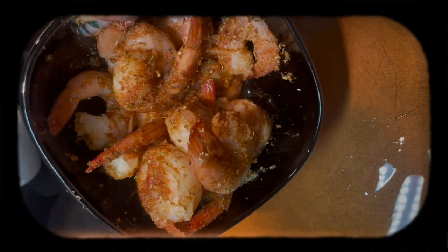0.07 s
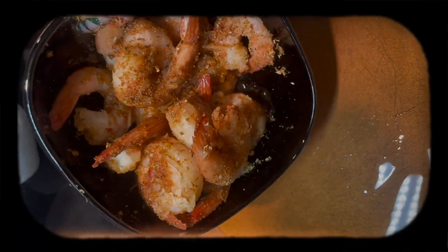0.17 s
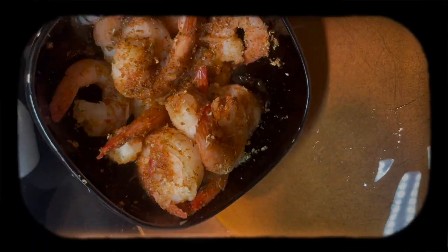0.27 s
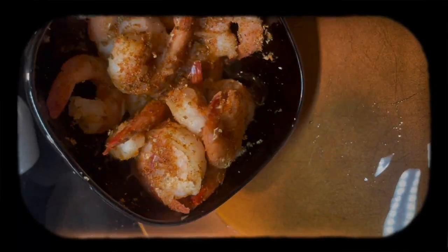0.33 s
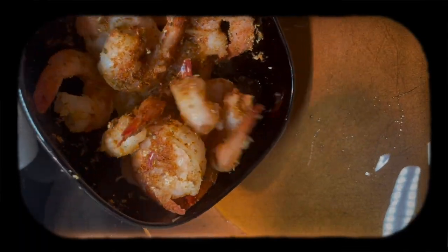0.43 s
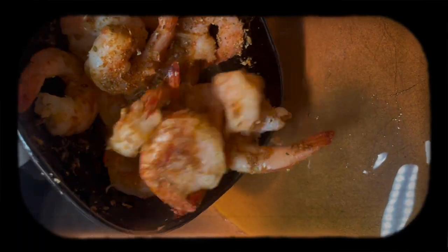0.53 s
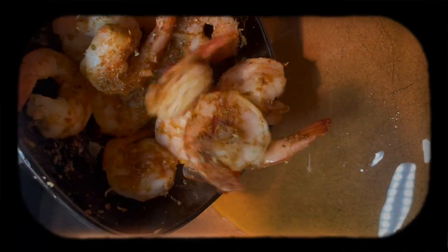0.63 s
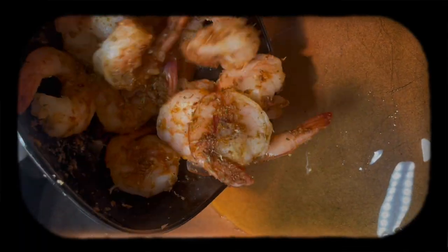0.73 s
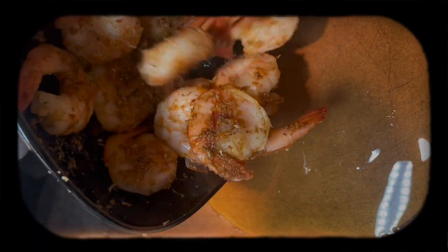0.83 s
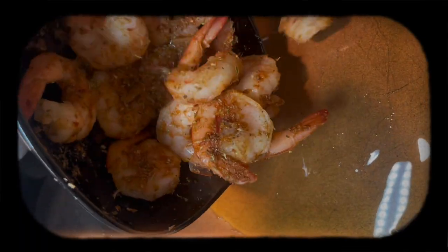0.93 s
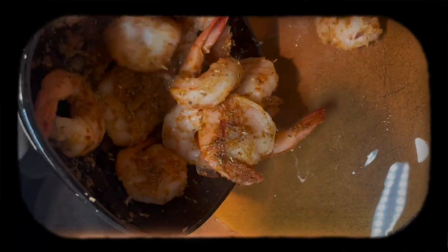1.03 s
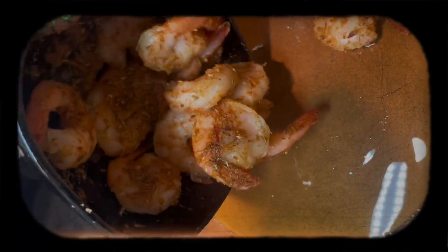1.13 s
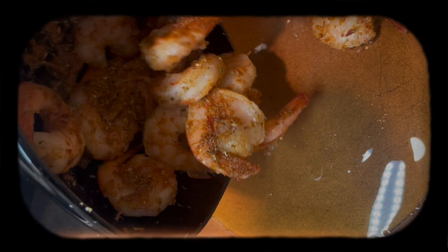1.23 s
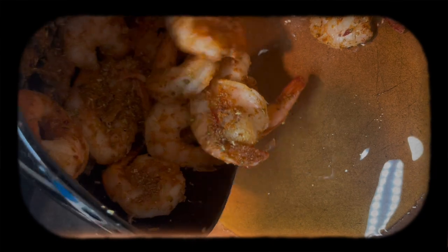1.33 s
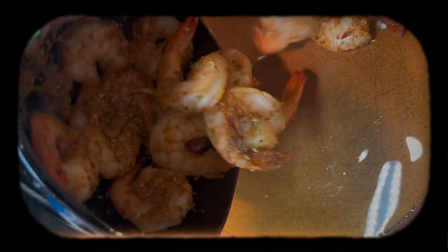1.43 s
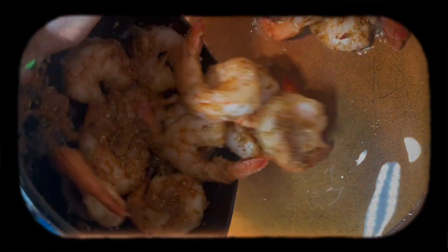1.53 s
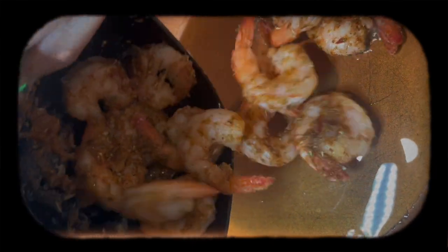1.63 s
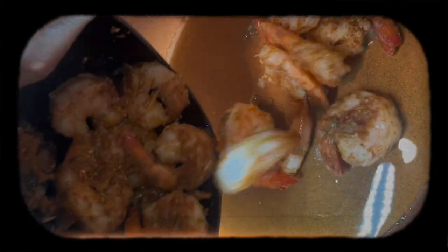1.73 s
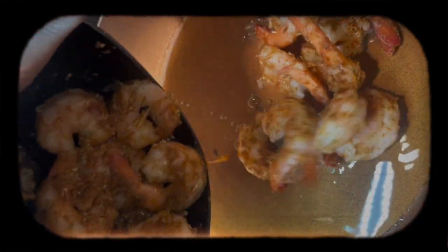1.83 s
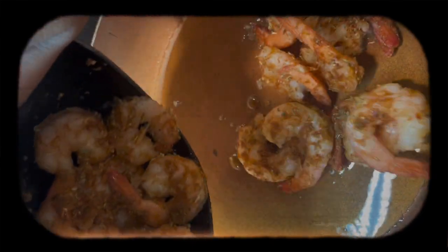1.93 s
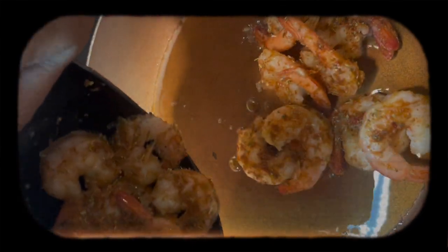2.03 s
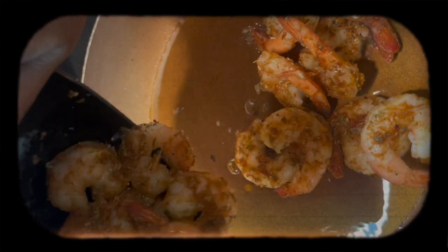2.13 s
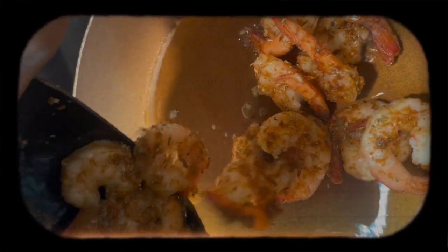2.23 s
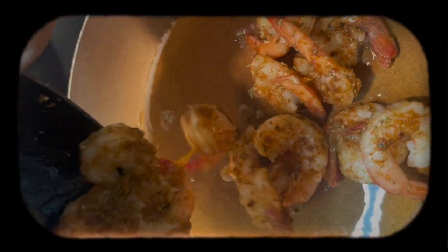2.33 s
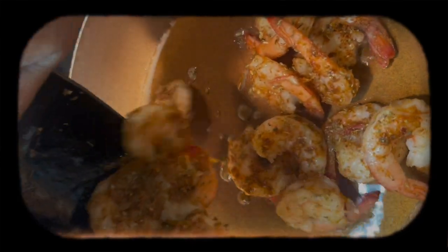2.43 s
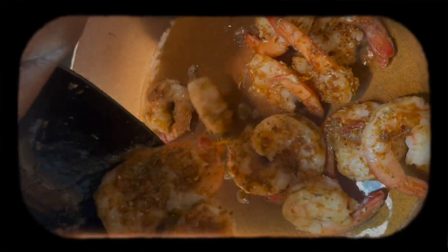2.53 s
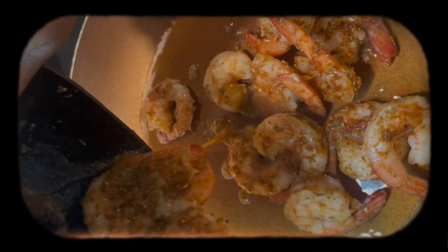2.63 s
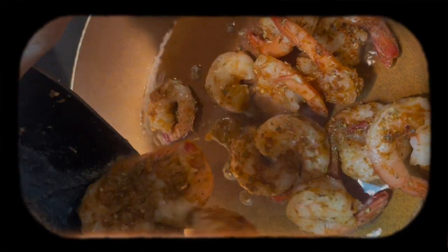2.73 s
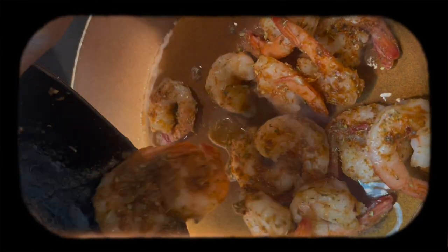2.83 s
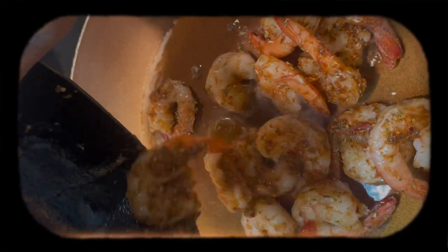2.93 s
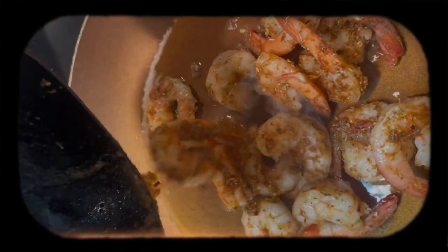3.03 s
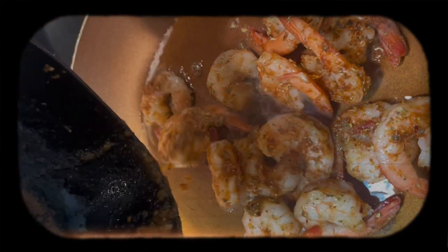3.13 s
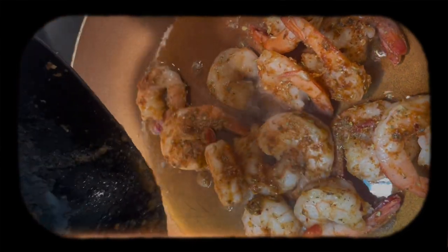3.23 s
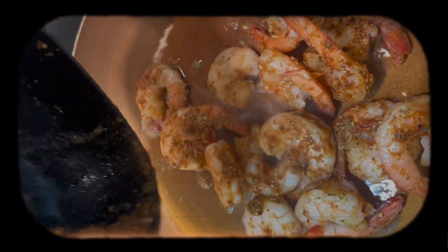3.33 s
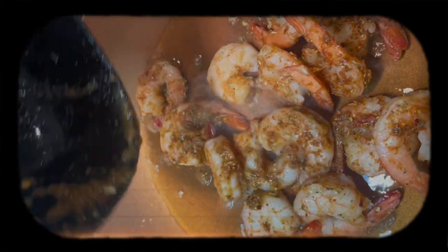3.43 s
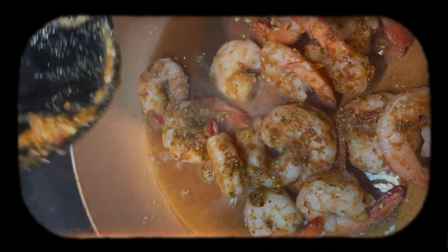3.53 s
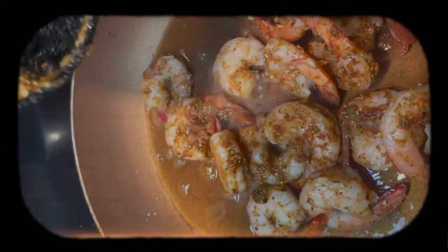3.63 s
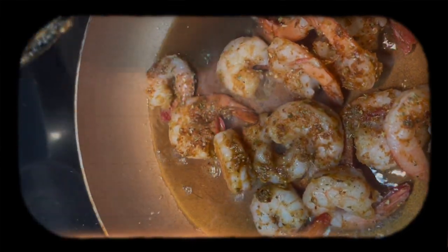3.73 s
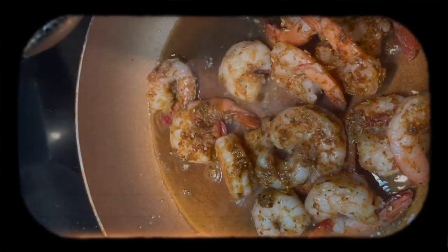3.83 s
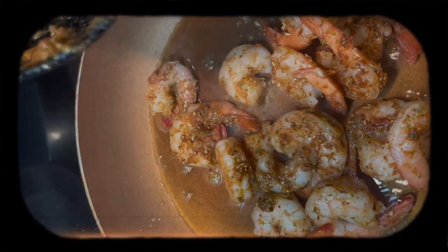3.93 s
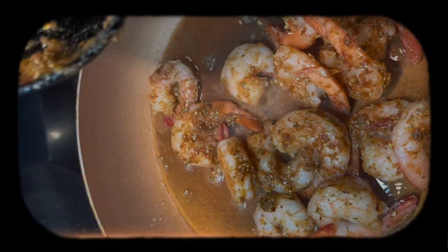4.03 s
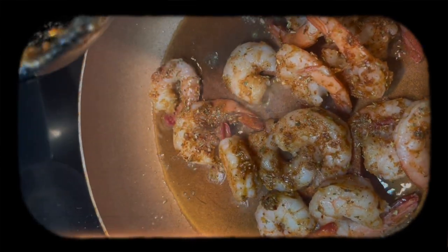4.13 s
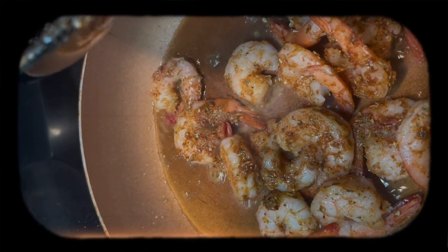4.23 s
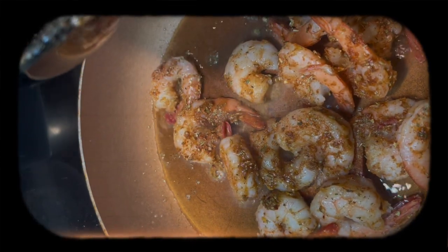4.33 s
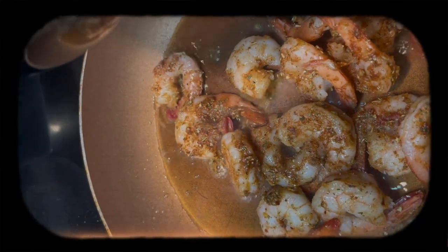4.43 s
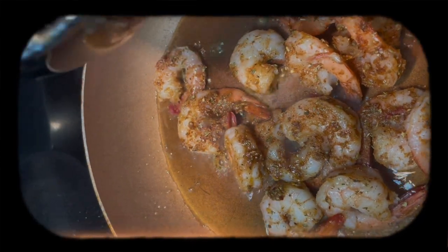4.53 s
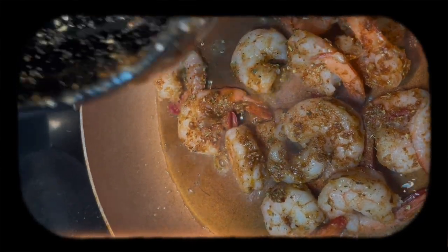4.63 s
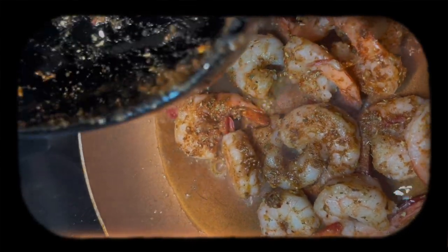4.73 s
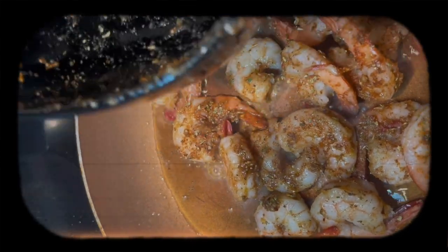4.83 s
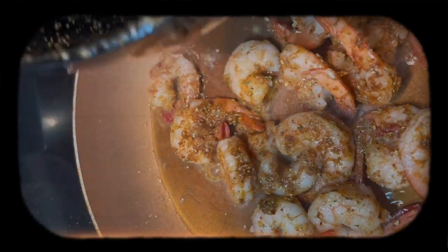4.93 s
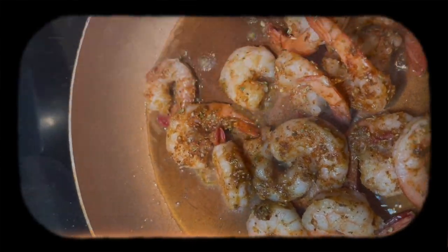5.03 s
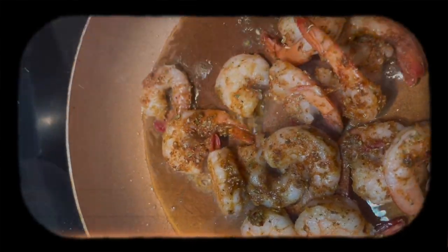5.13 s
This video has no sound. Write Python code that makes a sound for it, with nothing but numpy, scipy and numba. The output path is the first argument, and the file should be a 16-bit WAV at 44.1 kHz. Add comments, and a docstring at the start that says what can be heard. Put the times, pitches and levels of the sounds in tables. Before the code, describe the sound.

Close stereo view of a frying pan in a home kitchen. A faint low fan hum comes first, then small wet ticks as shrimp slide out of a bowl. They land in hot oil with soft thuds and slaps, each batch adding crackle. The sizzle grows quickly into a bright, steady hiss with sharp oil spits and an occasional deeper steam pop.

```python
"""A kitchen fan hums from the start: two tones and filtered noise. Seasoned shrimp creep out of a bowl near a
two-port microphone, unsticking with small wet ticks made of torn noise and tiny chirping rings.
Then they land in hot oil with soft thuds (pulses, noise and pan modes), while batches of water flash into
thousands of short bubble rings. The crackle builds to a steady hiss, with sharp spits of oil and deeper pops of
steam on top."""
import sys
import numpy as np
from scipy import signal
from scipy.fft import rfft, irfft, next_fast_len
from scipy.io import wavfile
from scipy.ndimage import uniform_filter1d
from numba import njit

SR = 44100
rng = np.random.default_rng(int(sys.argv[2]) if len(sys.argv) > 2 else 0)


def unload_audio(sound):
    """Save the sound as a 16-bit wav file, at the path given as the first command line argument."""
    columns = np.transpose(np.atleast_2d(sound))
    # keep every value between -1 and 1, then stretch to whole-number steps
    steps = np.round(np.clip(columns, -1, 1) * 32767)
    wavfile.write(sys.argv[1], SR, steps.astype(np.int16))


N = 228658
T = np.arange(N) / SR
SIZE = 2 * next_fast_len(N)
HZ = np.maximum(np.fft.rfftfreq(SIZE, 1 / SR), 1)
TOP_HZ = 15750  # upper limit of the sizzle and of the recorder


def undb(db):
    """Decibels to gain."""
    return 10 ** (np.asarray(db) / 20)


def unit(x):
    """Scale to rms 1."""
    return x / np.sqrt(np.mean(x ** 2))


def curves(rows):
    """Columns of a time table at every sample."""
    s, *columns = np.transpose(rows)
    return [np.interp(T, s, c) for c in columns]


def spectra(rows):
    """Columns of a frequency table at every bin, drawn along log frequency."""
    hz, *columns = np.transpose(rows)
    return [np.interp(np.log(HZ), np.log(np.sort(hz)), c) for c in columns]


def shape(x, gain):
    """Filter by a gain for every bin."""
    return irfft(rfft(x, SIZE) * gain, SIZE)[..., :N]


def below(hz, order=4):
    """Gain of a smooth low-pass; one minus this is the matching high-pass."""
    return 1 / (1 + (HZ / hz) ** order)


def fade(t60):
    """Exponential decay down to -60 dB."""
    return np.exp(-np.log(1000) * T[:int(t60 * SR) + 2] / t60)


def ring(hz, t60, rise=0):
    """One damped resonance; its pitch may rise by a share while it dies."""
    decay = fade(t60)
    t = T[:len(decay)]
    return decay * np.sin(2 * np.pi * hz * t * (1 + rise * t / t60 / 2))


def burst(t60):
    """Noise that dies away."""
    decay = fade(t60)
    return decay * rng.standard_normal(len(decay))


def pulse(hz):
    """One push of air: a single peak between two shallow dips."""
    a = (np.pi * (hz * T[:int(2 * SR / hz) + 1] - 1)) ** 2
    return (1 - 2 * a) * np.exp(-a)


def spatter(t60, spread_db=5, grain_s=.0012):
    """A wet tearing sound: one full snap, then uneven, mostly smaller ones that die away."""
    noise = burst(t60)
    grain = (np.arange(len(noise)) / (grain_s * SR)).astype(int)
    chance = np.clip(rng.standard_normal(grain[-1] + 1), -2, 2)
    size_db = spread_db * (chance - .5)
    return noise * undb(np.where(grain > 0, size_db[grain], 0))


def add(out, s, sound):
    """Mix a sound in at a time."""
    i = max(int(s * SR), 0)
    out[i:i + len(sound)] += sound[:max(N - i, 0)]


def walk(rate_hz):
    """Slow random wandering around zero, rms 1."""
    return unit(shape(rng.standard_normal(N), below(rate_hz)))


@njit
def grains(start, hz, cycles, size):
    """Each bubble rings for a cycle or so as it bursts."""
    out = np.zeros(N)
    for k in range(len(start)):
        length = cycles[k] * SR / hz[k]
        z = size[k] + 0j
        # turn by the pitch and shrink by about 50 dB over the length
        p = np.exp(2j * np.pi * hz[k] / SR - 5.75 / length)
        for i in range(start[k], min(N, start[k] + int(length) + 1)):
            z *= p
            out[i] += z.imag
    return out


def crackle(rate, spread_db, cycles, top_db, busy):
    """Bubbles of all pitches, many small and a few large; busy (0-1) thins the rate per second."""
    when, pitch, length, size, luck = rng.random((int(rate * N / SR), 5)).T
    start = (when * N).astype(np.int64)
    size_db = np.minimum(-spread_db * np.log(1 - size), top_db)
    # fewer bubbles are each made stronger, so thinning keeps the power
    sizes = undb(size_db) * (luck < busy[start]) / np.sqrt(busy[start])
    x = grains(start, 1200 + 15800 * pitch, cycles * (.5 + length), sizes)
    x = x - x.mean()
    # flatten the smoothed spectrum, so that colour is free to be added later
    power = uniform_filter1d(np.abs(rfft(x, SIZE)) ** 2, size=6001)
    return unit(shape(x, 1 / np.sqrt(power)))


# Swell of the whole fan. Each row: time in seconds, level in dB.
FAN_SWELL = [(0, -59.5), (1.1, -58), (2.4, -51), (3.15, -49.5), (3.6, -51.5), (5.18, -52)]
# Colour of the air the fan moves. Each row: frequency in Hz, relative level in dB.
AIR_COLOUR = [(25, -26), (45, -2), (80, 0), (130, -2), (190, -9), (280, -5.5), (335, -9), (385, 0.5),
              (430, -12.5), (480, -19.5), (850, -22.5), (1100, -32), (1600, -37.5), (3000, -48),
              (15000, -58)]


def fan(hum_hz=59, hum_db=0, mains_hz=120, mains_db=-11, air_db=-4.0, side_db=-12):
    """A motor hums at 59 Hz, with its magnetic buzz at 120 Hz and a low rush of air."""
    hum = undb(hum_db + .5 * walk(1.5)) * np.sin(2 * np.pi * hum_hz * T)
    buzz = undb(mains_db + 0.94 * walk(3.9)) * np.sin(2 * np.pi * mains_hz * T)
    colour = undb(spectra(AIR_COLOUR)[0])
    mid, side = (unit(shape(rng.standard_normal(N), colour)) for _ in range(2))
    side = shape(side, 1 - below(100))  # long waves reach both ports alike
    air = undb(air_db) * (mid + undb(side_db) * np.array([side, -side]))
    return (np.sqrt(2) * (hum + buzz) + air) * undb(curves(FAN_SWELL)[0])


# Wet ticks of shrimp coming unstuck from the bowl and each other. Each row: start in seconds,
# level of the rings in dB, starting pitch of a larger and of a smaller air pocket in Hz,
# t60 of the rings in seconds, level of the snap in dB, t60 of the snap in seconds.
WET_TICKS = [(.339, -75, 2900, 5000, .02, -66, .02), (.422, -62, 7000, 12900, .005, -52, .008),
             (.473, -66, 3100, 7000, .015, -58, .012), (.4835, -49, 3100, 3270, .055, -45, .085),
             (.526, -55, 7000, 13500, .012, -48, .022), (.547, -66, 7000, 13500, .005, -56, .008),
             (.575, -55, 1100, 1710, .02, -46, .04), (.595, -60, 5500, 7000, .012, -52, .012),
             (.5995, -58, 5800, 13500, .008, -49, .01), (.673, -54, 7000, 13000, .005, -44, .006),
             (.6803, -46, 1910, 2400, .02, -47, .025), (.756, -59, 3700, 4300, .014, -54, .012),
             (.802, -60, 7500, 13500, .006, -51, .008), (.8085, -53, 8000, 12500, .01, -44, .011),
             (.984, -45.5, 1800, 2200, .024, -46, .03)]
# The creep over the tilted bowl: start and time to full speed in seconds, level then, rise up to it in dB.
CREEP_S, CREEP_RISE_S, CREEP_DB, CREEP_RANGE_DB = 0.21, 0.62, -64.5, 31


def unsticking(snap_hz=1800, film_hz=1600):
    """Films of marinade stretch and snap; each snap rings two tiny air pockets that chirp as they close."""
    films = crackle(rate=9000, spread_db=3.2, cycles=1.5, top_db=17, busy=np.ones(N))
    speed = np.clip((T - CREEP_S) / CREEP_RISE_S, 0, 1)
    film_db = CREEP_DB - CREEP_RANGE_DB * (1 - speed) ** 2
    out = shape(films * undb(film_db), 1 - below(film_hz))
    snaps = np.zeros(N)
    for s, db, low_hz, high_hz, t60, snap_db, snap_t60 in WET_TICKS:
        add(snaps, s, undb(snap_db) * spatter(snap_t60))
        pockets = ring(low_hz, t60, rise=.15) + ring(high_hz, t60, rise=.15)
        add(out, s, undb(db) * pockets)
    return out + shape(snaps, 1 - below(snap_hz, order=2))


# Batches of shrimp meeting the oil. Each row: start in seconds, level of the sizzle they add in dB,
# time constant of its build-up in seconds, extra strength of the first flash of steam in dB.
OIL_BATCHES = [(0.885, -45.5, 0.055, 1.5), (1.22, -54, 0.045, 0), (1.385, -38.5, 0.23, 1.5),
               (1.68, -34.5, 0.065, -3), (1.88, -32.5, 0.085, -1), (2.2, -36, 0.072, 3),
               (2.395, -28, 0.024, -0.5), (2.6, -38, .04, -18)]
# Bubble sizes: fine fizz, middle, coarse. Each row: relative steady level in dB,
# relative level of the flash in dB, time constant of the flash's fade in seconds.
BUBBLE_SIZES = [(-3, 1.8, 0.46), (-2.5, -5.5, 2.3), (-11.5, -17, 0.36)]
# Time constant in seconds for juice to seep out and feed the steady sizzle, one per bubble size.
JUICE_SEEP_S = [0.56, 0.3, 1]
# Trapped marinade boiling off in short flares. Each row: start in seconds, hold in seconds,
# level of the fine bubbles in dB, level of the middle bubbles in dB.
MARINADE_FLARES = [(0.876, .015, -45, -60), (1.455, .04, -57, -58), (1.746, 0.027, -48, -42),
                   (1.925, 0.02, -48, -41), (2.105, .035, -45, -36), (2.455, 0.047, -42, -31.5),
                   (3.138, 0.3, -33, -27)]
FLARE_ATTACK_S, FLARE_RELEASE_S = 0.013, 0.042
CONTACT_DB, CONTACT_S = 1.5, .024  # surge of the flash at the moment of contact, and its fade


def steam():
    """Level in dB of each bubble size: every batch flashes off surface water, then settles to a sizzle."""
    power = np.zeros((len(BUBBLE_SIZES), N))
    for k, (steady_db, flash_db, flash_s) in enumerate(BUBBLE_SIZES):
        for s, db, build_s, wet_db in OIL_BATCHES:
            age = np.maximum(T - s, 0)
            contact = undb(CONTACT_DB) ** 2 * np.exp(-age / CONTACT_S)
            flash = undb(flash_db + wet_db) ** 2 * (np.exp(-age / flash_s) + contact)
            steady = undb(steady_db) ** 2 * (1 - np.exp(-age / JUICE_SEEP_S[k]))
            power[k] += undb(db) ** 2 * (1 - np.exp(-age / build_s)) * (flash + steady)
    for s, hold_s, fine_db, middle_db in MARINADE_FLARES:
        corners = s + np.cumsum([0, FLARE_ATTACK_S, hold_s, FLARE_RELEASE_S])
        flare = np.interp(T, corners, [0, 1, 1, 0])
        power[:2] += np.outer(undb([fine_db, middle_db]) ** 2, flare)
    return 10 * np.log10(power + 1e-14)


# Colour of the bursting bubbles. Each row: frequency in Hz, relative level in dB.
BUBBLE_COLOUR = [(30, -32), (100, -33), (250, -16), (700, -17), (1450, -12.5), (2200, -8), (2700, -6),
                 (4000, -3.5), (4900, -4.5), (5700, -2.5), (7900, 0), (9000, -0.2), (11700, 1.5),
                 (13800, 5), (15700, 0.5)]
# Resonances of the loaded pan, which tint the sizzle and ring under blows.
# Each row: nominal pitch in Hz, relative level when struck in dB, t60 in seconds.
LOADED_PAN = [(167, -11, .076), (308, -6, .12), (485, -7, .04), (668, -6.5, .08), (835, -7, .05),
              (1160, 0, .014), (1900, -2, .016), (2620, -9, .018), (3160, -12, .02), (6368, -14, .028)]


def pan_colour(ring_db=-4):
    """Spectrum of the bubbles, lifted where the pan resonates; oil and food widen its modes."""
    peaks = sum(1 / (1 + ((HZ - hz) * t60 / 2) ** 2) for hz, _, t60 in LOADED_PAN)
    return undb(spectra(BUBBLE_COLOUR)[0]) * (1 + undb(ring_db) * peaks)


def sizzle(levels, surge_db=0.96, patchy_db=0.5, fizz_db=-2.0, middle_db=0, coarse_db=1, sparse_db=-30):
    """Water flashes to steam in the oil: three sizes of bubble crackle in their own bands and levels."""
    busy = np.clip(undb(levels[0] - sparse_db), .5, 1)  # a quiet pan has fewer bubbles, so single ones stand out
    fine = crackle(rate=30000, spread_db=3.55, cycles=1.2, top_db=20, busy=busy)
    coarse = crackle(rate=36000, spread_db=2.4, cycles=1.2, top_db=13, busy=busy)
    colour = pan_colour() * (HZ < TOP_HZ)
    under_fizz, under_middle = below(9140, order=12), below(3144, order=10)
    sizes = [(fine, 1 - under_fizz, fizz_db),
             (fine, np.sqrt(1 - under_middle) * under_fizz, middle_db),
             (coarse, np.sqrt(under_middle), coarse_db)]
    out = np.zeros(N)
    for (x, band, db), level in zip(sizes, levels):
        bubbles = unit(shape(x, colour * band))
        # every size of bubble comes and goes a little on its own
        out += bubbles * undb(level + db + patchy_db * walk(18))
    return out * undb(surge_db * walk(3.7))


def pan_ring(blow_hz, octaves, detune=.025, uneven_db=3):
    """A blow rings modes near its pitch; where it falls and how food lies change their tuning and strength."""
    out = np.zeros(SR // 2)
    chances = rng.uniform(-1.1, 1, (len(LOADED_PAN), 3))
    for (hz, db, t60), (shift, size, side) in zip(LOADED_PAN, chances):
        reach = np.exp(-.5 * (np.log2(hz / blow_hz) / octaves) ** 2)
        gain = np.sign(side) * reach * undb(db + uneven_db * size)
        add(out, 0, gain * ring(hz * (1 + detune * shift), t60))
    return out


# Shrimp landing in the pan. Each row: start in seconds, level of the thud in dB, pitch of the thud in Hz,
# base level of the wet slap in dB, which the splash and the pan ring are set against.
PAN_LANDINGS = [(.885, -43, 85, -66), (.915, -48, 85, -66), (1.55, -41, 135, -39), (1.572, -43, 150, -45),
                (1.581, -46, 120, -41), (1.672, -50, 130, -46), (1.682, -38.5, 100, -42),
                (1.699, -44, 170, -48), (1.778, -45, 95, -45), (1.855, -50, 150, -44.5),
                (2.234, -39, 84.5, -41), (2.264, -40, 90, -44.5), (2.333, -44, 110, -42),
                (2.408, -39.5, 232, -37), (2.4912, -31.5, 105, -48), (2.531, -36.5, 95, -41),
                (2.578, -37, 150, -30.5), (2.597, -41, 230, -39), (2.899, -41, 110, -39),
                (3.17, -40, 95, -41)]


def landings(rock_hz=72, rock_t60=.09, rock_db=-12, pan_db=-3.0, splash_db=2, splash_t60=0.072,
             splash_hz=1700, flop_db=5.0, flop_t60=0.13, flop_hz=190):
    """Soft flesh pushes the pan, rocks it on the stove, rings it, slaps the oil aside and flops to rest."""
    out, splash, flop = np.zeros((3, N))
    for s, thud_db, thud_hz, slap_db in PAN_LANDINGS:
        peak_s = s + 1 / thud_hz
        add(out, s, undb(thud_db) * pulse(thud_hz))
        add(out, peak_s, -undb(thud_db + rock_db) * ring(rock_hz, rock_t60))
        add(flop, peak_s, undb(thud_db + flop_db) * burst(flop_t60))
        add(splash, s, undb(slap_db + splash_db) * spatter(splash_t60))
        add(out, s, undb(slap_db + pan_db) * pan_ring(blow_hz=597, octaves=2.8))
    return out + shape(splash, below(splash_hz)) + shape(flop, below(flop_hz))


# The loudest spits of oil. Each row: time in seconds, base level in dB, pitch of the ringing bubble in Hz,
# t60 of the spray in seconds.
LOUD_SPITS = [(.8905, -26, 12000, .006), (.8965, -23, 11500, .006), (.9835, -25.5, 12500, .004),
              (1.0297, -23, 11000, .004), (1.0943, -18.5, 10000, .004), (1.2551, -25.5, 6700, .004),
              (1.2809, -18.5, 12300, .008), (1.2858, -22.5, 8300, .006), (1.3834, -24, 9200, .004),
              (1.3983, -23, 5600, .008), (1.5707, -14.5, 11800, .005), (1.5818, -15.5, 7700, .005),
              (1.7524, -13.5, 11400, .004), (1.8605, -14, 8700, .004), (1.9381, -14, 12800, .005),
              (1.9623, -14, 9800, .003), (2.1429, -6, 5700, .004), (2.1975, -9, 13000, .005),
              (2.2304, -10, 10600, .004), (2.2452, -9, 7700, .004), (2.2844, -11, 11800, .003),
              (2.4042, -9, 9800, .004), (2.409, -2.5, 10200, .004), (2.4272, -7, 11800, .003),
              (2.4751, -5, 6400, .006), (2.5398, -3.5, 11000, .004), (2.6147, -3.5, 10200, .005),
              (2.6873, -.5, 5400, .016), (2.6884, -3, 6200, .014), (2.7421, -1.5, 6300, .018),
              (2.7432, -4, 5800, .016), (2.7466, -7, 9000, .012), (2.845, -4, 6800, .004),
              (2.9676, -7, 11000, .003), (3.2397, -5.5, 11000, .004), (3.2494, -4.5, 8700, .004),
              (3.265, -6, 11000, .004), (3.3163, -.7, 7400, .005), (3.39, -4, 8700, .004),
              (3.4079, -2, 6700, .005), (3.6045, -7.5, 6700, .004), (3.7578, -6.5, 8000, .004),
              (3.7989, -4, 7200, .005), (3.8139, -6.5, 6900, .004), (4.1796, -7, 6500, .006),
              (4.1952, -3.5, 6300, .011), (4.8183, -8.5, 11000, .003), (4.9082, -7, 9200, .003),
              (4.9685, -3.5, 9200, .005)]


def spits(sizzle_db, crack_db=-2, crack_ratio=1.25, bubble_t60=.0015, spray_db=-13, stray_db=13,
          stray_spread_db=2.6, stray_top_db=7, stray_hz=10000, stray_t60=.003, count=260):
    """A large bubble cracks open, rings briefly and throws a fine spray; strays prickle above the sizzle."""
    out = np.zeros(N)
    strays = []
    for when, size, pitch in rng.random((count, 3)):
        extra_db = min(-stray_spread_db * np.log(1 - size), stray_top_db)
        db = sizzle_db[int(when * N)] + stray_db + extra_db
        hz = stray_hz * 2 ** (1.2 * (pitch - .5))  # spread over 1.2 octaves
        strays.append((when * T[-1], db, hz, stray_t60))
    for s, db, hz, t60 in LOUD_SPITS + strays:
        add(out, s - 1 / hz, undb(db + crack_db) * pulse(crack_ratio * hz))
        add(out, s, undb(db) * ring(hz, bubble_t60))
        add(out, s, undb(db + spray_db) * burst(t60))
    return shape(out, 1 - below(3200))


# Pockets of steam blowing out from under the shrimp. Each row: start in seconds, level of the push in dB,
# pitch of the push in Hz, level of the pan's ring in dB.
STEAM_POPS = [(1.0942, -39, 2100, -54), (1.2298, -38, 2300, -49), (1.3982, -40, 1900, -44),
              (1.471, -50, 1050, -45), (1.5052, -47, 1900, -50), (1.5494, -33, 1200, -46),
              (1.7735, -41, 1300, -39), (2.1422, -21.5, 1650, -36), (2.4635, -28, 1200, -42),
              (3.9884, -18, 1800, -34)]


def pops():
    """Trapped steam lifts the flesh and escapes in one push; the shrimp drops back and rings the pan."""
    out = np.zeros(N)
    for s, db, hz, ring_db in STEAM_POPS:
        add(out, s, undb(db) * pulse(hz))
        add(out, s + 1 / hz, undb(ring_db) * pan_ring(hz, octaves=.7))
    return out


def scatter(x, longest_s, change_hz, count=16):
    """Bubbles burst all over the pan, so their short reflections change from moment to moment."""
    lags = (longest_s * SR * (np.arange(count) + 1 + rng.random(count)) / count).astype(int)
    knots = np.arange(0, T[-1] + 1 / change_hz, 1 / change_hz)
    weights = np.array([np.interp(T, knots, rng.standard_normal(len(knots))) for _ in lags])
    weights = weights / np.linalg.norm(weights, axis=0)
    return sum(w * np.pad(x, (lag, 0))[:N] for w, lag in zip(weights, lags))


# Stereo spread by frequency. Each row: frequency in Hz, left minus right phase in radians,
# base diffuse share in dB, left minus right level in dB.
STEREO_SPREAD = [(100, 0, -26, 0), (300, -.15, -12, 0), (700, -.4, -7, -3), (1050, 0, -6, -4),
                 (1400, .1, -14, -1), (2200, 0, -14, 0), (3000, -1.3, -1.5, -4), (3900, -4.6, -2, -.5),
                 (4800, -3.4, -3, 0), (5400, -6.28, -8, 0), (6200, -5.7, -8, 0), (8200, -4.1, -8, 0),
                 (9200, -3.17, -31, 0), (11000, -3.11, -31, 0), (12000, -2.1, -7, 0), (13600, -.9, -7, 0),
                 (14600, 0, -18, 0)]


def spread_stereo(x, diffuse_db, longest_s=.004):
    """Each band gets a left-right phase and level difference, and a share of diffuse short echoes."""
    phase, share_db, balance_db = spectra(STEREO_SPREAD)
    share = np.minimum(undb(share_db + diffuse_db), 1)
    out = []
    for sign in (1, -1):  # left, right
        side = undb(sign * balance_db / 2)
        focused = shape(x, side * np.sqrt(1 - share ** 2) * np.exp(.5j * sign * phase))
        echoes = scatter(x, longest_s, change_hz=500)
        out.append(focused + shape(echoes, side * share))
    return np.array(out)


def scene():
    """Everything in the pan, over the fan; spits burst in the open, so they are less diffuse."""
    levels = steam()
    in_pan = spread_stereo(sizzle(levels) + pops() + unsticking() + landings(), diffuse_db=0)
    in_open = spread_stereo(spits(levels[1]), diffuse_db=-3)
    return in_pan + in_open + fan()


def record(dry):
    """The recorder cuts the deepest rumble and the top."""
    dry = signal.sosfilt(signal.butter(3, 40, "high", fs=SR, output="sos"), dry)
    return signal.sosfilt(signal.ellip(12, .1, 80, TOP_HZ, fs=SR, output="sos"), dry)


dry = scene()
out = record(dry)
unload_audio(out)
```